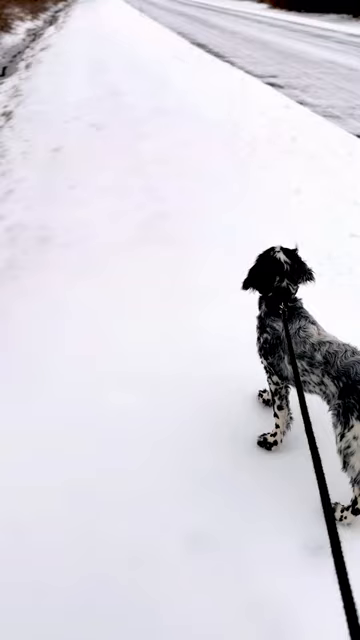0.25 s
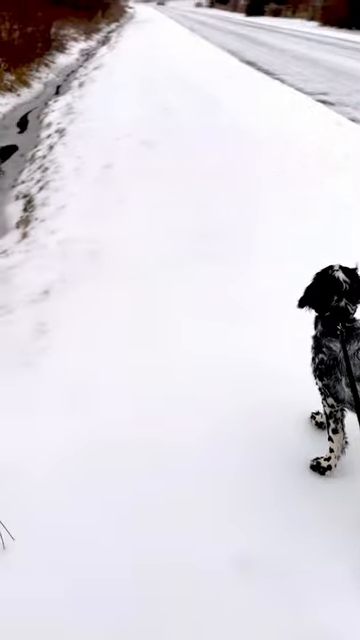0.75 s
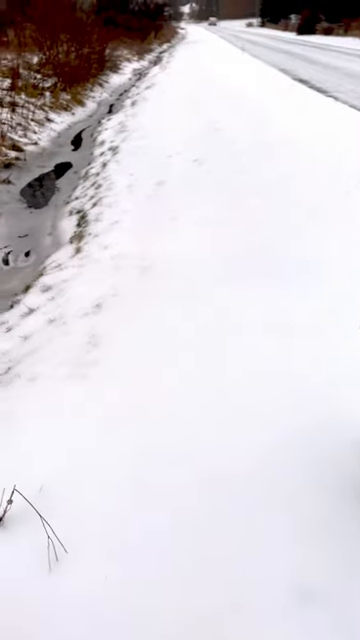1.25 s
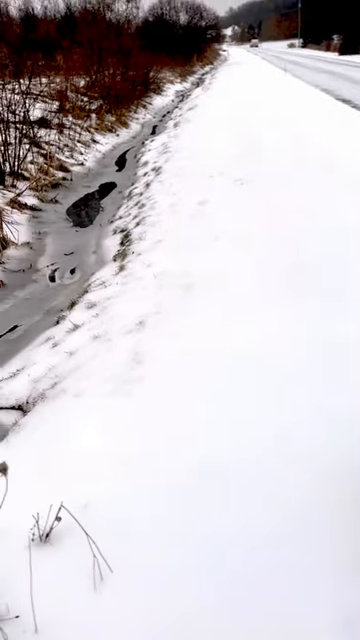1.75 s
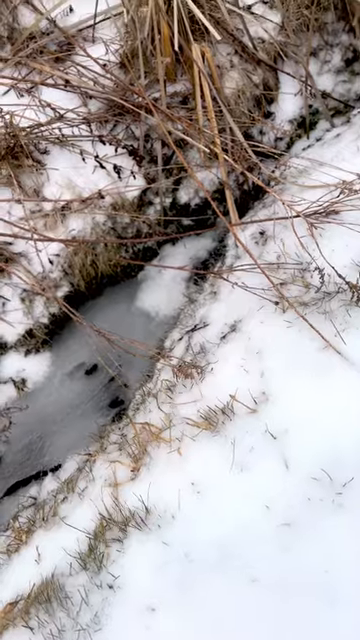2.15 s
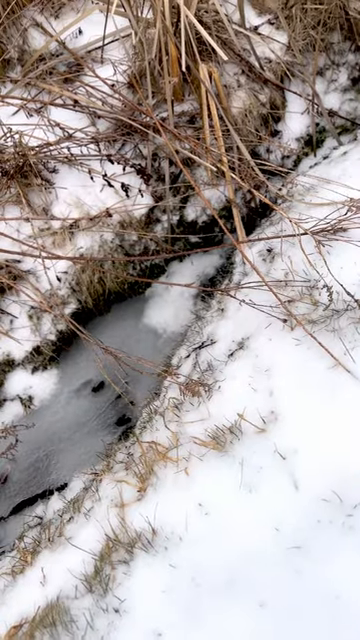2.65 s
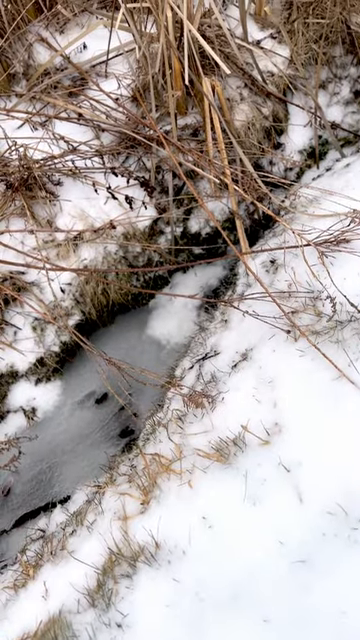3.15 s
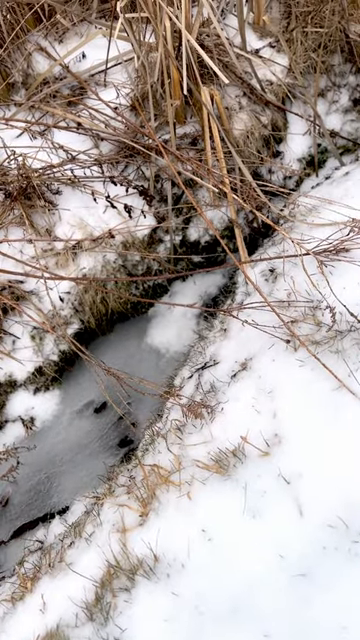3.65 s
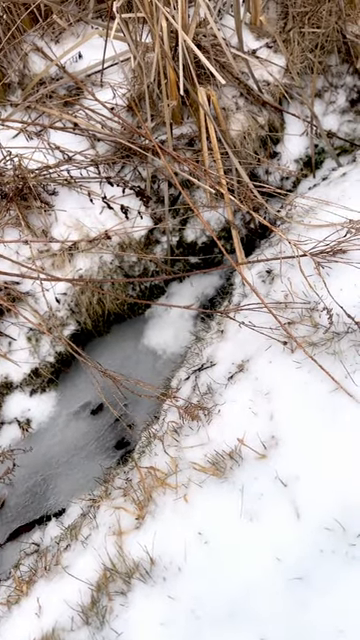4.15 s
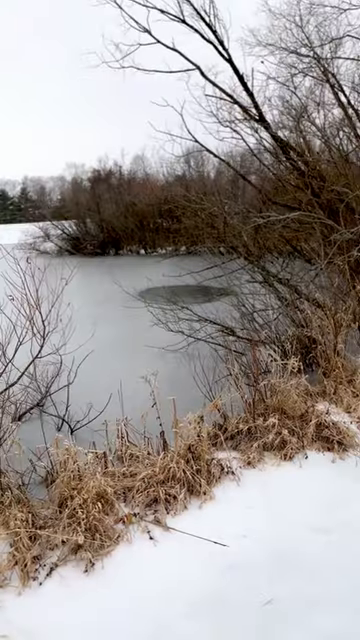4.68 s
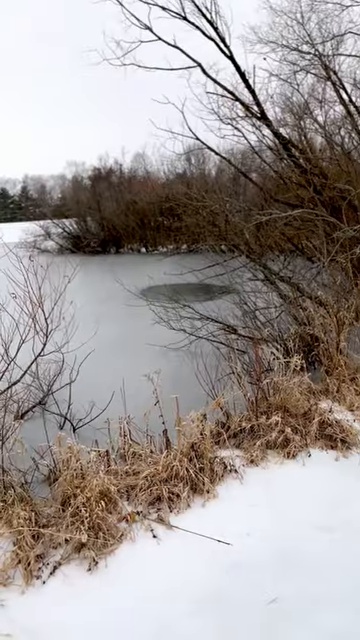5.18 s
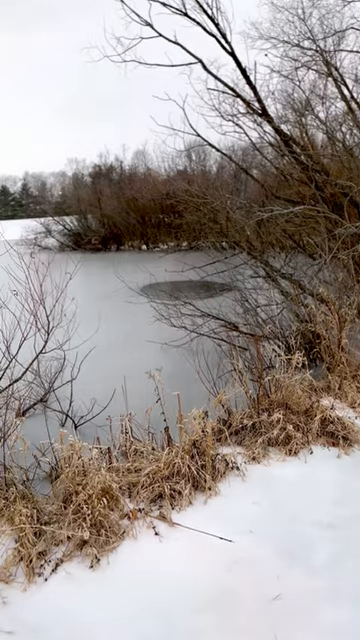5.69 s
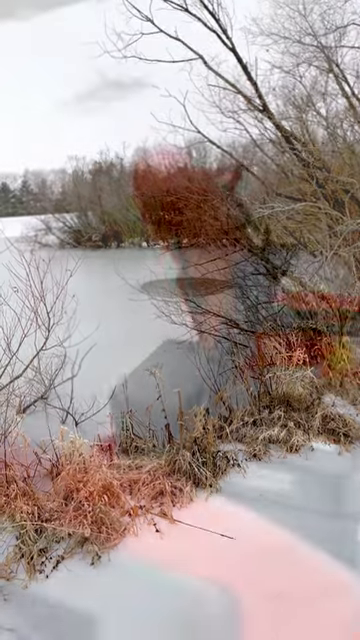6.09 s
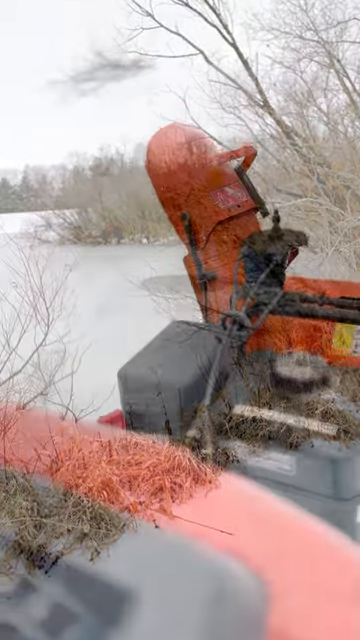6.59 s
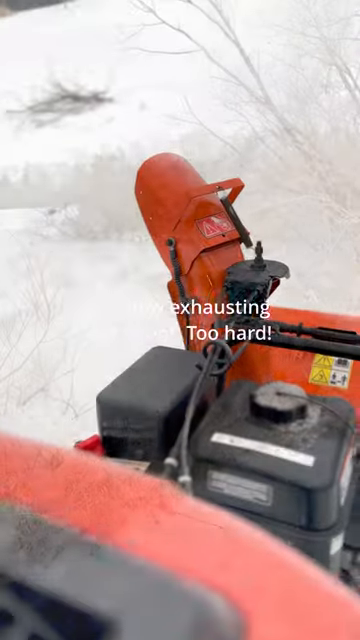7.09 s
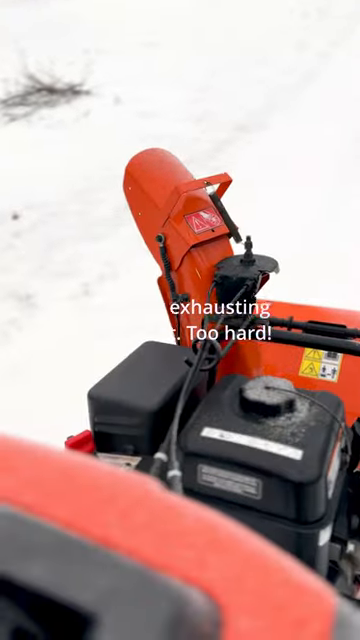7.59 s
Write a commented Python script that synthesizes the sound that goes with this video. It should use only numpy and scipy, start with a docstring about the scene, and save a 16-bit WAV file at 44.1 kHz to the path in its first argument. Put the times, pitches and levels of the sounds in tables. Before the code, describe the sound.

Four winter outdoor sounds follow each other in hard cuts. At first wind rumbles on the microphone with soft, low thumps, easing and then gusting again just after 1 second. A bird gives a faint, high chirp around 1.3 seconds. At 1.8 seconds a brook takes over, gurgling under ice with irregular hollow glugs, bright drips and tiny splashes over a fine trickle. At 4.3 seconds the water stops and low gusts buffet the microphone again until about 5.1 seconds. A quiet hiss remains, with very faint scattered crunches and a small twig snap near 5.8 seconds. At about 6.6 seconds a snowblower cuts in close by, already at full speed. Its small gasoline engine is the loudest sound, a rapid, steady firing drone with mechanical clatter that continues to the end, near 7.8 seconds.

```python
"""Four winter scenes in hard cuts. First, wind buffets the microphone by a snowy road; birds chip.
At 1.8 s a brook gurgles under ice: bubbles ring air pockets and the hollow above the water.
At 4.3 s, gusts by a pond, with faint crunches and then snapping twigs. From 6.6 s a snowblower runs
close by at full speed: its one-cylinder four-stroke engine fires through a muffler, over clatter.
Throughout, the microphone delays bass behind treble."""
import sys
import numpy as np
from scipy import signal
from scipy.fft import rfft, irfft, next_fast_len
from scipy.io import wavfile
from scipy.ndimage import uniform_filter1d

SR = 44100
rng = np.random.default_rng(int(sys.argv[2]) if len(sys.argv) > 2 else 0)


def log_audio(samples):
    """Write samples as a 16-bit WAV file to the path given in sys.argv[1]."""
    # one column per channel
    frames = np.atleast_2d(samples).T
    # limit to full scale, then quantise
    limited = np.clip(frames, -1, 1)
    pcm = np.round(limited * 32767).astype(np.int16)
    wavfile.write(sys.argv[1], SR, pcm)


N = 345303
BROOK_S, POND_S, ENGINE_S = 1.826, 4.33, 6.554  # cuts


def amp(db):
    return 10 ** (np.asarray(db) / 20)


def unit_rms(x):
    return x / np.sqrt(np.mean(x ** 2) + 1e-20)


def wander(count, size):
    return unit_rms(uniform_filter1d(rng.standard_normal(count), size=size))


def bell(t, width):
    return np.exp(-.5 * (t / width) ** 2)


def at_hz(points, hz):
    f, value = np.transpose(points)
    return np.interp(np.log(hz + 1), np.log(f + 1), value)


def curve(rows):
    """Sample span of a time table and its value at each sample."""
    s, value = np.transpose(rows)
    at = np.arange(round(s[0] * SR), min(round(s[-1] * SR), N))
    return slice(at[0], at[-1] + 1), np.interp(at / SR, s, value)


def add(mix, s, sound, left_db=0):
    part = mix[:, round(s * SR):][:, :len(sound)]
    part += amp([[left_db / 2], [-left_db / 2]]) * sound[:part.shape[1]]


def filtered(x, response):
    size = next_fast_len(x.shape[-1] + 8192)
    return irfft(rfft(x, size) * response(np.fft.rfftfreq(size, 1 / SR)), size)[..., :x.shape[-1]]


def minimum_phase(spectrum):
    """Filter taps that ring only after the impulse."""
    half = at_hz(spectrum, np.fft.rfftfreq(16384, 1 / SR)) * np.log(10) / 20
    log_gain = np.concatenate([half, half[-2:0:-1]])
    return np.fft.ifft(np.exp(np.conj(signal.hilbert(log_gain)))).real[:8192]


def noise(count, spectrum, coherence, patchy_db, size=1024):
    """Stereo noise of rms 1 with patches drifting in time and frequency."""
    hz = np.fft.rfftfreq(size, 1 / SR)
    a, b, c, d, patches = rng.standard_normal((count * 4 // size + 6, len(hz), 5)).T
    patches = unit_rms(uniform_filter1d(uniform_filter1d(patches, size=10, axis=0), size=8, axis=1))
    shared = np.clip(at_hz(coherence, hz), -1, 1)[:, None]
    left = a + 1j * b
    right = shared * left + np.sqrt(1 - shared ** 2) * (c + 1j * d)
    frames = np.array([left, right]) * amp(at_hz(spectrum, hz)[:, None] + patchy_db * patches)
    return unit_rms(signal.istft(frames, nperseg=size, noverlap=size * 3 // 4)[1][:, :count])


def reflections(dry, level_db, t60_s):
    """Dry sound plus scattered echoes off close banks and reeds."""
    t = np.arange(5000) / SR
    tail = rng.standard_normal((2, 5000)) * (rng.random((2, 5000)) < .05)
    tail *= amp(-60 * t / t60_s) * (t > .003)
    return dry + amp(level_db) * signal.oaconvolve(dry, tail / np.linalg.norm(tail[0]), axes=1)[:, :N]


# Each row: multiple of the firing rate, gain in dB.
MUFFLER_ORDERS = [(1, -41), (2, -0.5), (3, -3.5), (4, 0), (5, 0.5), (6, 2), (7, -7.5), (8, 2), (9, 2.5),
                  (10, -3), (11, -20.5), (12, -18), (13, -25.5), (14, -19.5), (15, -8), (16, -17),
                  (17, -15.5), (19, -26.5), (21, -23), (27, -15.5), (28, -25), (29, -23.5), (32, -19)]
# Each row: frequency in Hz, gain in dB.
MUFFLER_RASP = [(1100, -31), (1600, -25), (3000, -100)]


def exhaust(blows, firing_hz):
    """Each blow rings the muffler."""
    muffler = [(6.6, -42.5)] + [(order * firing_hz, db) for order, db in MUFFLER_ORDERS] + MUFFLER_RASP
    return unit_rms(signal.oaconvolve(blows, minimum_phase(muffler))[:len(blows)])


# Each row: time in seconds, firings per second, exhaust level in dB.
ENGINE_RUN = [(6.557, 30.62, -19), (7.366, 30.68, -19.5), (7.541, 30.38, -20), (7.83, 30.46, -19.5)]
# Fan, valves and sheet metal; valve gear alone. Each row: frequency in Hz, density in dB.
CLATTER_SPECTRUM = [(24, -25), (40, -21), (110, -12), (199, 3), (261, -11), (360, -11.5), (485, -6),
                    (582, -17), (780, -15.5), (950, -11.5), (1060, -17), (1450, -15.5), (2100, -21),
                    (2240, -18.5), (3890, -26), (4890, -32), (7060, -30), (8280, -35.5), (9500, -31.5),
                    (12400, -109)]
RATTLE_SPECTRUM = [(700, -30), (1100, 0), (2400, -4), (5000, -16)]
# Each row: share of the four-stroke cycle since firing, clatter gain in dB.
STROKE_GAIN = [(0, -2.5), (.08, -2), (.16, 4), (.22, 0.5), (.3, 2.5), (.45, 2), (.7, 0), (.85, 1.5)]
# Each row: frequency in Hz, left-right coherence (clipped to +-1 in use).
ENGINE_COHERENCE = [(150, 3), (300, 0.6), (500, 0.5), (1200, 0.5), (1900, 0.93), (2300, 0.5), (2900, -0.27),
                    (4500, 0.46), (5000, -0.76), (5700, 1), (7200, 5.5), (8400, 0.5), (8800, -1.5)]


def engine():
    """Uneven firings drive exhaust and valve rattle; clatter swells with the strokes; the impeller hums."""
    start = round((ENGINE_S - .2) * SR)  # already running at the cut
    t = np.arange(start, N) / SR
    s, *columns = np.transpose(ENGINE_RUN)
    firing_hz, exhaust_db = (np.interp(t, s, column) for column in columns)
    count, firing_at_s, impeller_hz = len(t), 6.562, 131
    cycles = np.cumsum(firing_hz) / SR - (firing_at_s - t[0]) * firing_hz[0]
    firings = np.flatnonzero(np.diff(np.floor(cycles)))
    strength, jitter = rng.standard_normal((len(firings), 2)).T
    firings += np.round(.00008 * SR * jitter).astype(int)
    blows = np.zeros(count)
    blows[np.clip(firings, 0, count - 1)] = amp(.6 * strength)
    swell = amp(np.interp(cycles, *np.transpose(STROKE_GAIN), period=1))
    clatter = unit_rms(swell * noise(count, CLATTER_SPECTRUM, ENGINE_COHERENCE, 1.55, size=512))
    speed = firing_hz / firing_hz.mean() + .0091 * wander(count, 6000)
    hum = np.sin(2 * np.pi * impeller_hz * np.cumsum(speed) / SR)
    valve_burst = noise(1440, RATTLE_SPECTRUM, ENGINE_COHERENCE, 3, size=256)
    rattle = unit_rms(signal.oaconvolve(blows[None], valve_burst, axes=1)[:, :count])
    machinery = amp(-23.5) * clatter + amp(-34.5) * hum + amp(-39) * rattle
    out = np.zeros((2, N))
    out[:, start:] = two_ports(amp(exhaust_db) * exhaust(blows, firing_hz.mean()) + machinery)
    return out


# Each row: frequency in Hz, left over right in dB.
LEFT_GAIN = [(60, 0), (140, 0), (320, 3), (740, 7), (1700, 1), (3920, 1), (9050, 0)]
# Each row: frequency in Hz, left phase lead in radians.
LEFT_LEAD = [(60, 0), (250, 0.14), (690, 1.0), (950, 0.49), (2000, 0)]


def two_ports(x):
    """The engine reaches the left microphone port louder and earlier."""
    sides = np.array([[.5], [-.5]])
    return filtered(x, lambda f: amp(at_hz(LEFT_GAIN, f) * sides) * np.exp(1j * at_hz(LEFT_LEAD, f) * sides))


def bubble(hz, t60_s, fuzz, rise_s):
    """A ringing air pocket; fuzz shivers its pitch, as when several burst together."""
    t = np.arange(1500) / SR
    shiver = 1 + fuzz * wander(len(t), 60)
    envelope = np.minimum(t / rise_s, 1) ** 2 * amp(-60 * t / t60_s)
    return envelope * np.sin(2 * np.pi * hz * np.cumsum(shiver) / SR)


# Each row: start in seconds, level in dB, pitch in Hz.
BIG_BUBBLES = [(1.83, -33.5, 494), (1.862, -31, 458), (1.909, -28, 485), (1.973, -31, 456),
               (2.038, -27, 493), (2.175, -25.5, 508), (2.22, -31, 500), (2.486, -27, 488),
               (2.578, -24.5, 520), (2.629, -32.5, 440), (2.694, -26.5, 458), (2.771, -27.5, 463),
               (2.829, -28.5, 499), (2.867, -21.5, 483), (2.937, -26.5, 448), (3.03, -28, 454),
               (3.108, -28, 430), (3.169, -33.5, 626), (3.206, -31, 445), (3.301, -28.5, 478),
               (3.412, -22, 165), (3.572, -29, 532), (3.845, -22.5, 502), (3.969, -31.5, 513),
               (4.111, -35.5, 587), (4.222, -41, 686)]
SMALL_BUBBLES = [(1.913, -33, 5260), (1.9328, -30.5, 2400), (2.0982, -31, 2970), (2.486, -35.5, 970),
                 (2.537, -31, 4930), (2.542, -33, 2560), (2.562, -31, 2870), (2.567, -38.5, 1040),
                 (2.764, -34, 1250), (2.7813, -20.5, 3300), (2.9365, -34, 2810), (3.0508, -28.5, 2740),
                 (3.217, -25.5, 4830), (3.346, -28, 3780), (3.413, -31.5, 2090), (3.688, -28, 2770),
                 (3.731, -35, 1278), (3.839, -36.5, 1810), (4.04, -34, 4700), (4.256, -40, 1100),
                 (4.2607, -26, 3000), (4.2944, -25.5, 3350), (1.9396, -36, 6140), (2.865, -35, 5550),
                 (3.2621, -35, 4840), (3.5669, -32, 10500), (3.6008, -44, 6340), (3.638, -44, 5400),
                 (3.6856, -37, 9350), (3.704, -39, 8200), (3.8846, -36, 5170), (4.274, -31.5, 9610),
                 (2.624, -40, 1020), (3.243, -41, 1070), (3.548, -40, 1300)]
# Each row: frequency in Hz, gain in dB, t60 in seconds.
HOLLOW_MODES = [(626.5, -10.5, 0.049), (877, -22.5, 0.062), (1310, -25, 0.051)]


def glugs_and_drips():
    """Big bubbles ring with the hollow under the ice; small ones and drips ring alone."""
    out = np.zeros((2, N))
    for s, db, hz in BIG_BUBBLES:
        glug = bubble(hz, .021, fuzz=.016, rise_s=.0021)
        ring = amp(-8.5) * bubble(hz, .054, fuzz=.01, rise_s=.0043)
        hollow = sum(amp(gain) * bubble(f, t60, fuzz=.032, rise_s=.0022) for f, gain, t60 in HOLLOW_MODES)
        add(out, s, amp(db) * (glug + ring + hollow), left_db=-1.5)
    for s, db, hz in SMALL_BUBBLES:
        add(out, s, amp(db) * bubble(hz, 36 / hz + .0068, fuzz=.032, rise_s=.0017), left_db=-1.5)
    return out


# Each row: peak time in seconds, level in dB.
SPLASH_HITS = [(1.828, -54), (2.166, -43.5), (2.244, -49.5), (2.736, -49), (3.1664, -46), (3.3044, -38.5),
               (3.416, -43), (3.726, -48.5), (4.2654, -45)]
# Each row: frequency in Hz, density in dB.
SPLASH_SPECTRUM = [(1760, -47), (3000, -6), (3840, -10), (7430, -4.5), (7870, 0), (9500, 0.5), (12400, -15)]


def splashes():
    """Water splashes in short, bright bursts of noise."""
    out, t = np.zeros((2, N)), np.arange(4000) / SR
    rise_s, t60_s, coherence = .003, .016, [(3000, .13), (9000, -.13)]
    envelope = np.minimum(t / rise_s, 1) ** 2 * amp(10 - 60 * t / t60_s)
    for s, db in SPLASH_HITS:
        at = round((s - rise_s) * SR)
        out[:, at:at + len(t)] += amp(db) * envelope * noise(len(t), SPLASH_SPECTRUM, coherence, 5.9, 256)
    return out


# Each row: pitch in Hz, gain in dB.
AIR_POCKETS = [(470, -2), (640, -10.5), (950, -6), (1300, -11.5), (1700, -9.5), (2250, -4.5), (2900, -1),
               (3350, 2), (4800, -7.5), (5700, -9), (7500, -11), (9300, -10.5)]


def trickle(per_s=450, pitch_spread=.16):
    """Small bubbles ring the air pockets under the ice at random."""
    out, length_s = np.zeros((2, N)), POND_S - BROOK_S
    for when, pick, size, pan, stray in rng.random((round(per_s * length_s), 5)):
        hz, db = AIR_POCKETS[int(pick * len(AIR_POCKETS))]
        level_db = db - 3.15 * np.log(size + .02)
        ring = bubble(hz * (1 + pitch_spread * (stray - .5)), 24 / hz + .011, fuzz=.03, rise_s=.0017)
        add(out, BROOK_S + when * length_s, amp(level_db) * ring, left_db=8 * pan - 5)
    return out


# Each row: low and high edge in Hz, bursts per second, t60 in seconds, level in dB.
SPATTER_BANDS = [(1000, 3160, 90, 0.037, -64), (3520, 5730, 52, 0.024, -64.5),
                 (5930, 9250, 28, 0.049, -70.5)]


def spatter(count):
    """Fine spatter: each noise band flares in its own random bursts."""
    out, t = np.zeros((2, count)), np.arange(6000) / SR
    for low_hz, high_hz, per_s, t60_s, db in SPATTER_BANDS:
        bursts = amp(2.44 * np.minimum(rng.exponential(1, count), 4)) * (rng.random(count) < per_s / SR)
        envelope = signal.oaconvolve(bursts, np.minimum(t / .014, 1) ** 2 * amp(-60 * t / t60_s))[:count]
        band = [(low_hz * .16, -40), (low_hz, 0), (high_hz, 0), (high_hz * 2.2, -40)]
        out += amp(db) * unit_rms(envelope * noise(count, band, AIR_COHERENCE, 3.6, size=256))
    return out


# Each row: time in seconds, gain of trickle and spatter in dB.
FLOW_GAIN = [(1.82, -1), (2.3, -2), (3.5, 0), (3.9, -0.5), (4.33, -1)]


def brook():
    """Glugs, drips and splashes over trickle and spatter that surge with the flow."""
    t, span = np.arange(N) / SR, slice(round(BROOK_S * SR), round(POND_S * SR))
    water = glugs_and_drips() + splashes()
    bubbles = trickle()
    surge = amp(3 * wander(N, 2500) + np.interp(t, *np.transpose(FLOW_GAIN)))
    bubbles *= surge
    water += amp(-53) * bubbles / np.std(bubbles[:, span])
    out = reflections(water, level_db=-12, t60_s=.05)
    out[0] = np.roll(out[0], 6)  # water on the right reaches the left port later
    out[:, span] += spatter(span.stop - span.start) * unit_rms(surge)[span]
    return out * np.clip((POND_S - t) / .01, 0, 1)


# Each row: time in seconds, level in dB.
WIND_LEVEL = [(0, -30), (.44, -44), (.6, -48.5), (.77, -58.5), (1.07, -52), (1.13, -41), (1.26, -44.5),
              (1.35, -64.5), (1.6, -60.5), (1.8, -52.5), (4.3, -52.5), (4.4, -40.5), (4.58, -32),
              (4.65, -58), (4.7, -35.5), (4.89, -40.5), (4.97, -49), (5.09, -35), (5.2, -69.5), (5.9, -58),
              (6.55, -55.5)]
# Each row: frequency in Hz, density in dB.
RUMBLE_SPECTRUM = [(12, -27), (20, 6), (45, 7), (64, 10), (135, -3), (162, -28), (200, -18), (260, -77)]
BUFFET_SPECTRUM = [(60, 2), (130, 21.5), (250, -18), (400, -11), (700, -48), (2000, -68)]
# Each row: peak time in seconds, level in dB, pulse width in seconds.
KNOCK_PULSES = [(.03, -28, 0.00095), (0.211, -25, 0.00096), (0.287, -17.5, 0.00039), (.415, -27, 0.00088),
                (0.454, -30, 0.00082), (1.113, -34, 0.0013), (1.176, -38, 0.0011), (1.217, -32, 0.0013),
                (3.415, -27, 0.00013), (4.328, -30, 0.0013), (4.679, -23, 0.0012), (4.771, -29.5, 0.0014),
                (5.082, -27.5, 0.0014)]


def wind_and_knocks():
    """Wind rumble and buffets with soft knocks, plus one sharp knock at the brook."""
    out, pulse_t = np.zeros((2, N)), np.arange(2000) / SR
    span, level_db = curve(WIND_LEVEL)
    t = np.arange(N)[span] / SR
    buffet = amp(level_db - 17.5) + amp(-68)  # floor in a calm
    for s, db, width_s in KNOCK_PULSES:
        add(out, s - .015, amp(db) * bell(pulse_t - .015, width_s))
        flare = amp(db - 11.5) * min(width_s / .00049, 1)  # sharp knocks flare less
        buffet += flare * bell(t - s - .014, .024)
    coherence = [(30, 1), (300, .95)]
    out[:, span] += amp(level_db) * noise(len(t), RUMBLE_SPECTRUM, coherence, .17, size=2048)
    out[:, span] += buffet * noise(len(t), BUFFET_SPECTRUM, coherence, 5.7, size=512)
    return out


# Each row: start in seconds, level in dB.
TWIG_SNAPS = [(5.756, -59), (5.7917, -45), (5.808, -60)]
# Each row: frequency in Hz, gain in dB.
TWIG_SPECTRUM = [(500, -30), (1200, -11), (2000, 3), (3000, -22), (4300, -3), (5300, -25), (6400, -9),
                 (8000, -29)]


def twigs(rise_s=.0013, t60_s=.017):
    """Twigs break with a brief resonant crack."""
    out, t = np.zeros((2, N)), np.arange(4000) / SR
    for s, db in TWIG_SNAPS:
        crack = unit_rms(filtered(rng.standard_normal(len(t)), lambda f: amp(at_hz(TWIG_SPECTRUM, f))))
        add(out, s, np.minimum(t / rise_s, 1) * amp(db - 60 * t / t60_s) * crack)
    return out


# Each row: start in seconds, level in dB, start and end pitch in Hz, length in seconds.
BIRD_CHIPS = [(1, -76.5, 6900, 6500, 0.14), (1.298, -53.5, 5700, 8060, 0.024),
              (1.463, -71, 6340, 7300, 0.031)]


def birds():
    """Each chip is a short, high glide."""
    out = np.zeros((2, N))
    for s, db, start_hz, end_hz, length_s in BIRD_CHIPS:
        hz = np.linspace(start_hz, end_hz, round(length_s * SR))
        add(out, s, amp(db) * np.sin(2 * np.pi * np.cumsum(hz) / SR) * signal.windows.tukey(len(hz), .5))
    return out


# Each row: time in seconds, level in dB.
POND_CRUNCHES = [(4.351, -69.5), (4.792, -65), (4.961, -75), (5.177, -65.5), (5.497, -66), (5.8504, -65),
                 (6.1, -71.5), (6.1697, -73), (6.212, -69), (6.442, -65)]
# One row: time in seconds, level in dB, band centre in Hz.
ROAD_RUSTLE = (1.397, -67, 1650)


def crunches(crunch_hz=3060, width_hz=1020):
    """Faint puffs of band noise: crunches across the pond, one rustle by the road."""
    out, t = np.zeros((2, N)), np.arange(4000) / SR
    for s, db, hz in [(s, db, crunch_hz) for s, db in POND_CRUNCHES] + [ROAD_RUSTLE]:
        band = filtered(rng.standard_normal(len(t)), lambda f: np.exp(-((f - hz) / width_hz) ** 2))
        add(out, s - .008, amp(db) * bell(t - .016, .0071) * unit_rms(band), left_db=-2)
    return out


# Each row: start and length in seconds, start and end pitch in Hz, level in dB.
FAR_WHISTLES = [(.35, 0.7, 2610, 2613, -76), (1.235, 0.16, 2500, 2500, -72), (1.205, 0.27, 5000, 4900, -78),
                (1.375, .09, 2480, 2370, -70), (1.46, .37, 2500, 2560, -70)]


def whistles():
    """Thin, far tones that waver in pitch and level."""
    out = np.zeros((2, N))
    for s, length_s, start_hz, end_hz, db in FAR_WHISTLES:
        hz = np.linspace(start_hz, end_hz, round(length_s * SR))
        wobble, flutter = (wander(SR, size)[:len(hz)] for size in (200, 900))
        tone = np.sin(2 * np.pi * np.cumsum(hz) / SR + .5 * wobble)
        add(out, s, amp(db + 2.5 * flutter) * tone * signal.windows.tukey(len(hz), .18))
    return out


# Each row: frequency in Hz, density in dB.
ROAD_HISS = [(150, -37), (250, 1), (845, -1.5), (1840, -12), (2530, -7), (3130, -16.5), (3590, -13),
             (4510, -16), (4940, -29), (6900, -22.5), (9500, -46), (12400, -92)]
BROOK_HISS = [(150, -63), (250, -51), (481, 15), (595, -1), (1330, -13), (1800, -18), (2900, -10),
              (3900, -23), (4790, -16), (9500, -19), (12400, -103)]
POND_HISS = [(150, -24), (250, 0), (595, -7.5), (1330, -21), (2240, -16.5), (3030, -27.5), (3700, -19.5),
             (4440, -27.5), (5010, -35.5), (6300, -28), (9500, -42.5), (12400, -77)]
# Each row: time in seconds, level in dB.
ROAD_LEVEL = [(0, -65.5), (1.4, -64), (1.826, -61.5)]
BROOK_LEVEL = [(1.83, -60), (4.33, -64)]
POND_LEVEL = [(4.33, -69), (6.55, -67)]
# Each row: frequency in Hz, left-right coherence.
AIR_COHERENCE = [(60, 0.88), (250, 0), (600, 0), (2500, 0.11), (9000, 0.)]


def air():
    """The far hiss of each quiet place."""
    out = np.zeros((2, N))
    places = (ROAD_LEVEL, ROAD_HISS, 3), (BROOK_LEVEL, BROOK_HISS, 4.2), (POND_LEVEL, POND_HISS, 2.2)
    for levels, spectrum, patchy_db in places:
        span, level_db = curve(levels)
        out[:, span] += amp(level_db) * noise(len(level_db), spectrum, AIR_COHERENCE, patchy_db)
    return out


def microphone(x, lag_cycles=1.7, advance_s=.002, low_cut_hz=25):
    """Bass lags treble, so blows fall in pitch; the deepest bass is lost."""
    def response(f):
        turns = f * advance_s - lag_cycles * np.log(np.clip(f, 30, 3000) / 3000)
        return np.exp(2j * np.pi * turns) * f ** 2 / (f ** 2 + low_cut_hz ** 2)
    return filtered(x, response)


def scene():
    """Road, brook and pond, then the cut to the snowblower."""
    quiet = wind_and_knocks() + air()
    quiet += reflections(whistles() + birds() + crunches(), level_db=-3, t60_s=.37)
    quiet += reflections(twigs(), level_db=-4, t60_s=.38)
    quiet += brook()
    quiet[:, round(3.281 * SR):round(3.299 * SR)] *= amp(-35)  # the level dips briefly
    cut = np.clip((np.arange(N) / SR - ENGINE_S) / .001, 0, 1)
    return (1 - cut) * microphone(quiet) + cut * microphone(engine())


def record(dry):
    """Steep low-pass at 11.8 kHz."""
    return signal.oaconvolve(dry, signal.firwin(511, 11800, window=("kaiser", 9), fs=SR)[None], "same")


dry = scene()
out = record(dry)
log_audio(out)
```